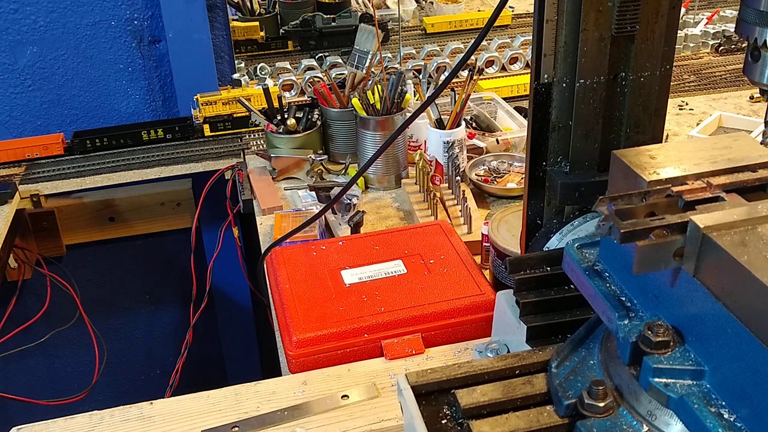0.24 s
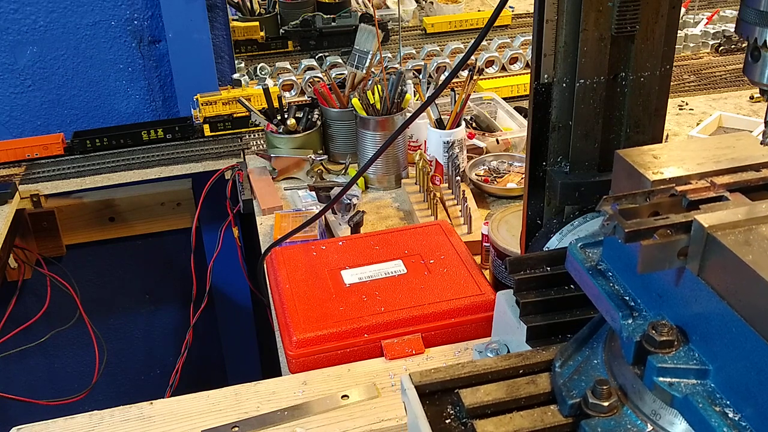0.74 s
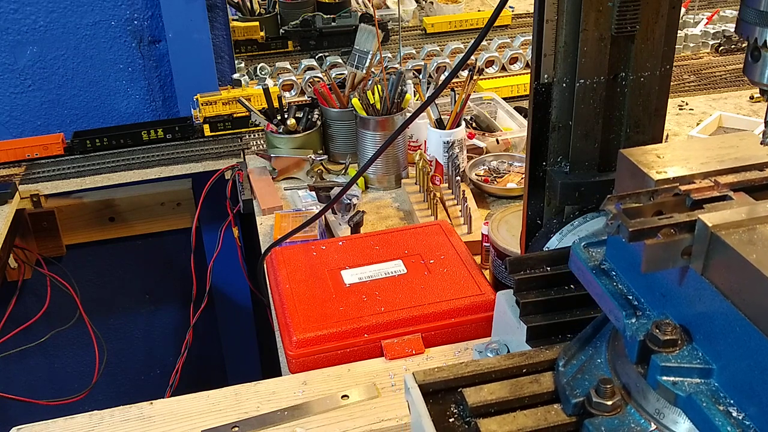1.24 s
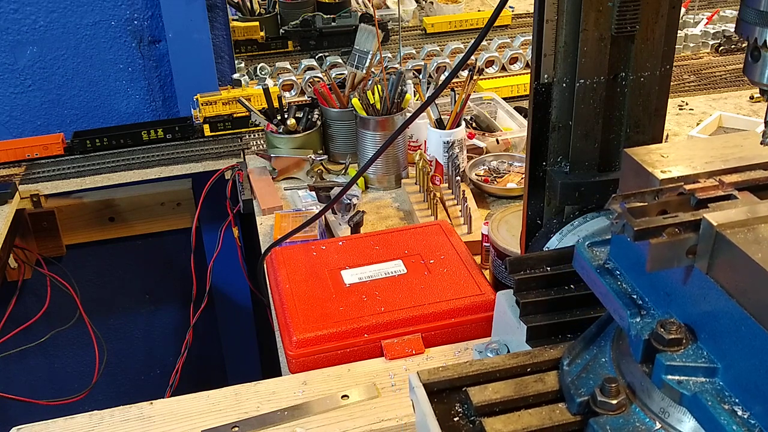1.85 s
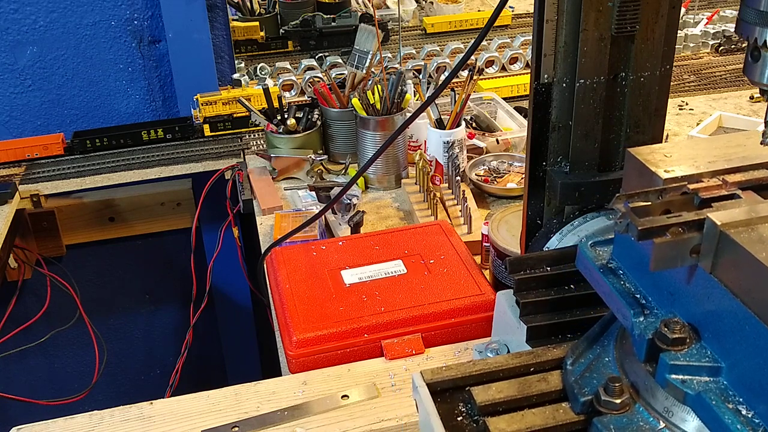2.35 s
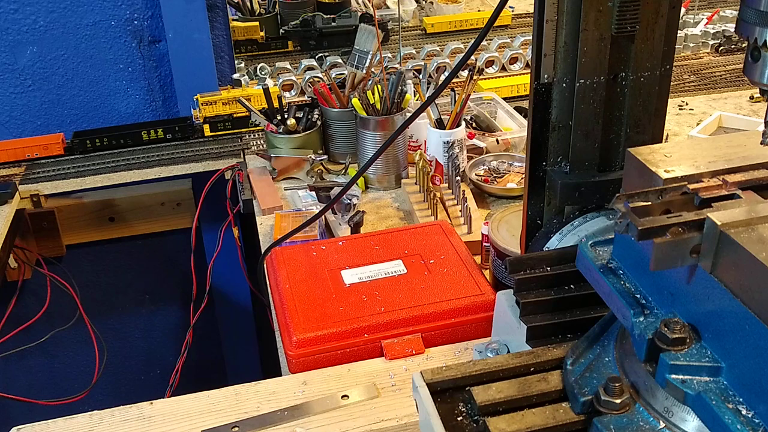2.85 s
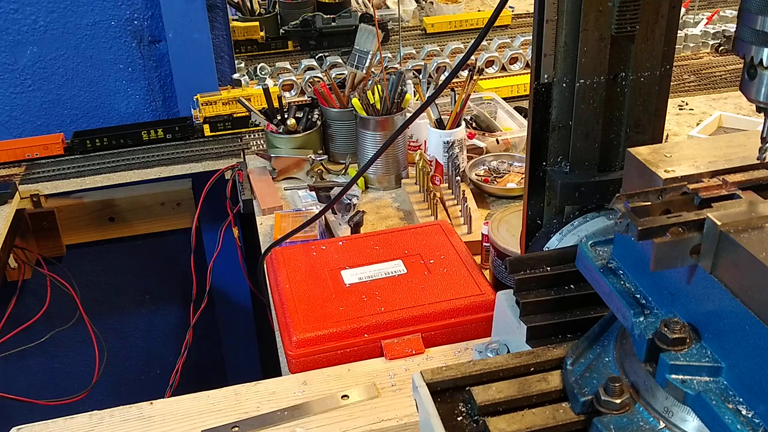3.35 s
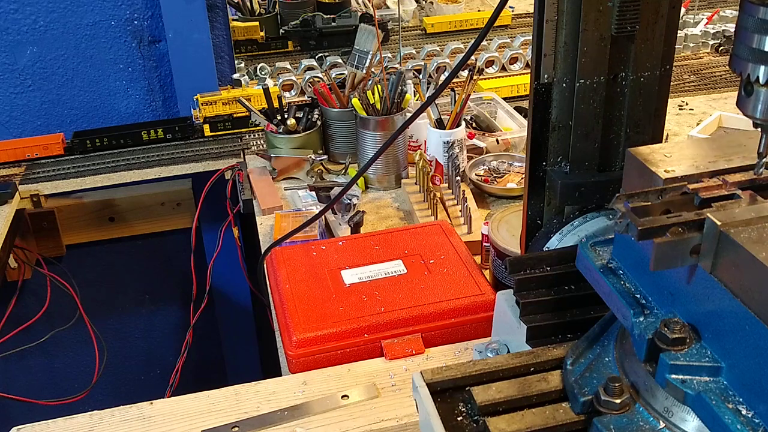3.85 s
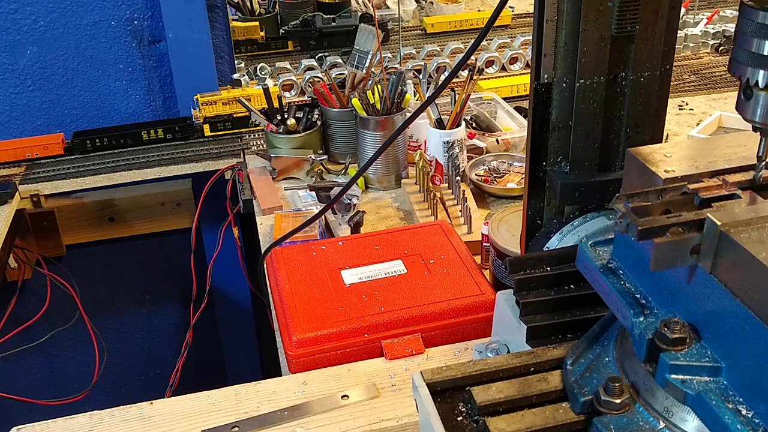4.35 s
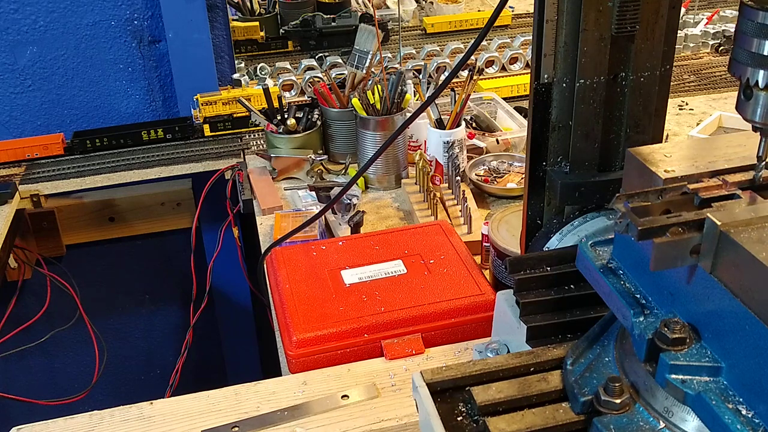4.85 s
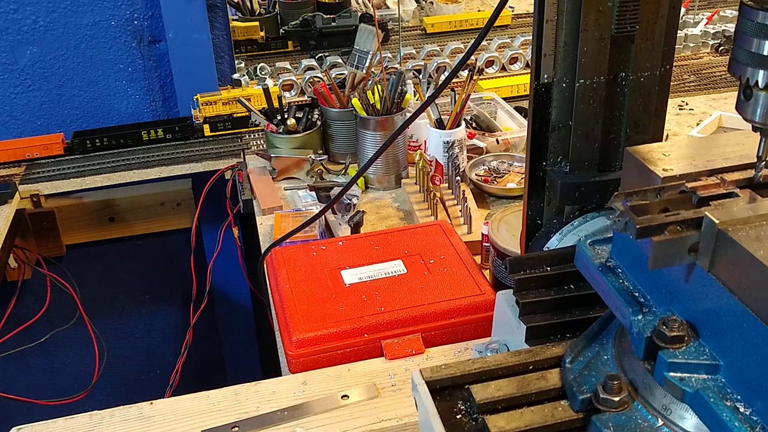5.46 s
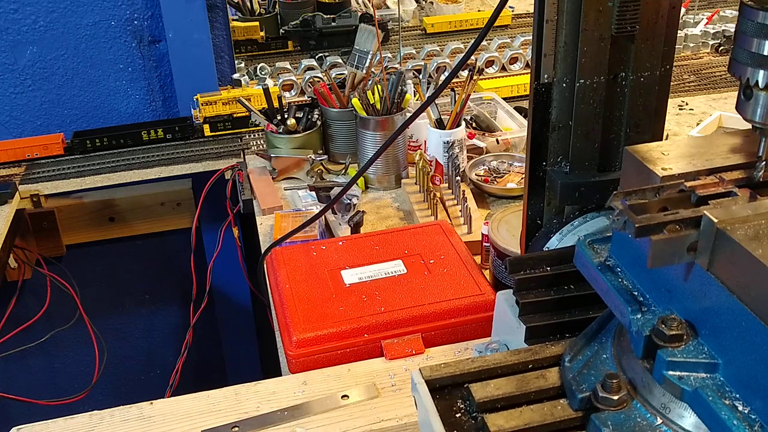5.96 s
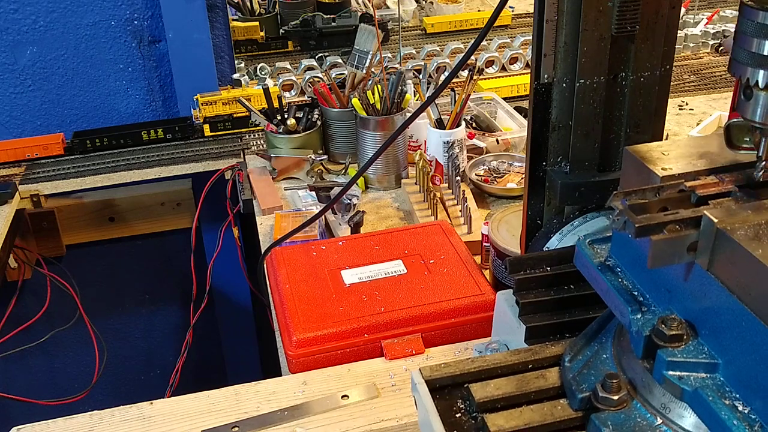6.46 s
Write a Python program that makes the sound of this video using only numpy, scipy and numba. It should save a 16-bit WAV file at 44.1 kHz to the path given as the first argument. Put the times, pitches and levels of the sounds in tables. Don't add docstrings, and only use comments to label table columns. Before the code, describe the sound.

Close, wide stereo of dry metal sticking and slipping: four rough, low-rattling groans with rising rings and dull table thuds, then four fast, higher squeals, loudest on the third. Tiny clicks fall between strokes. Then the machine stops and sparse, soft knocks and ticks come irregularly until the end, with quiet bassy air and distant fans in a small, briefly echoing workshop.

```python
import sys
import numpy as np
from scipy import signal
from scipy.fft import rfft, irfft
from scipy.io import wavfile
from scipy.ndimage import uniform_filter1d, minimum_filter1d
from numba import njit

SR = 44100
rng = np.random.default_rng(int(sys.argv[2]) if len(sys.argv) > 2 else 0)


def put_to_file(sound):
    columns = np.atleast_2d(sound).T
    safe = np.clip(columns, -1, 1)
    whole_steps = np.round(safe * 32767)
    wavfile.write(sys.argv[1], SR, whole_steps.astype(np.int16))


def invert_db(x):
    u = np.asarray(x, float) / 20
    return 10 ** u


N = 295188
EDGE_DB, SILENT_DB = -21.5, -51.5


def rms_one(x):
    return x / np.sqrt(np.mean(x ** 2) + 1e-20)


def evened(x, over_s):
    return x / np.sqrt(uniform_filter1d(x * x, round(over_s * SR)) + 1e-12)


def between(x, low_hz, high_hz):
    band_hz = [low_hz, min(high_hz, .45 * SR)]
    return signal.sosfilt(signal.butter(2, band_hz, "band", fs=SR, output="sos"), x)


def delayed(x, lag_s):
    hz = np.fft.rfftfreq(N, 1 / SR)
    return irfft(rfft(x) * np.exp(-2j * np.pi * hz * lag_s), N)


def at_hz(points, hz):
    points_hz, values = np.transpose(points)
    return np.interp(np.log(hz + 1), np.log(points_hz), values)


def drift(rate_hz):
    r = np.exp(-2 * np.pi * rate_hz / SR)
    noise = rng.standard_normal(N + 9000)
    return rms_one(signal.lfilter([1], [1, -2 * r, r * r], noise)[9000:])


def in_time(strokes):
    t = np.arange(N) / SR
    s, *columns = np.concatenate(strokes).T
    gate = sum((t >= rows[0][0]) & (t <= rows[-1][0]) for rows in strokes)
    return [uniform_filter1d(gate * 1., size=200)] + [np.interp(t, s, c) for c in columns]


def body(x, modes):
    out = 0
    for k, (hz, width_hz, db) in enumerate(modes):
        r = np.exp(-np.pi * width_hz / SR)
        a = [1, -2 * r * np.cos(2 * np.pi * hz / SR), r * r]
        ring = signal.lfilter([(1 - r * r) / 2, 0, (r * r - 1) / 2], a, x + 1e-18)
        out = out + (-1) ** k * invert_db(db) * ring
    return out


@njit
def moving_ring(x, hz, r, turn):
    y = np.zeros(len(x))
    for i in range(2, len(x)):
        push = (1 - r * r) / 2 * (x[i] - x[i - 2])
        y[i] = push + 2 * r * np.cos(turn * hz[i]) * y[i - 1] - r * r * y[i - 2]
    return y


def slips(rate_hz, rough, jitter, uneven_db, grit):
    rough = np.clip(rough, 0, 1)
    turns = np.cumsum(rate_hz * (1 + jitter * rough * drift(60)) / SR)
    at = np.flatnonzero(np.diff(np.floor(turns)) > 0)
    late = np.clip((turns[at + 1] % 1) * SR / rate_hz[at], 0, 1)
    size = invert_db(uneven_db * rough * drift(90))[at] * np.sqrt(SR / rate_hz[at])
    pulses = np.zeros(N)
    pulses[at] = size * late
    pulses[at + 1] += size * (1 - late)
    scrape = rng.standard_normal(N) * np.exp(-2.2 * (turns % 1))
    return pulses * (1 - rough) + grit * rough * scrape


# time in seconds, depth in dB.
CATCHES = [
    (0.014, 9),
    (.062, 5),
    (0.368, 9),
    (0.437, 12.5),
    (1.082, 7),
    (1.428, 4),
    (1.981, 3.5),
    (2.064, 3),
    (2.399, 7),
]


def catches_db():
    t, catch_s = np.arange(N) / SR, 0.013
    return sum(-depth_db * np.exp(-((t - s) / catch_s) ** 2) for s, depth_db in CATCHES)


def groan_stroke(s, length, db, first_hz, thud_db):
    attack_s, release_s, sag_db_per_s = 0.015, .03, 74.5
    hum_db, thud_from = -53, 0.4
    ages = [0, min(attack_s, .5 * length), thud_from * length, length, length + release_s]
    levels = [db + EDGE_DB, db, db - sag_db_per_s * ages[2], db - sag_db_per_s * length, db + SILENT_DB - 14]
    table = [hum_db - 10.5, hum_db, hum_db, thud_db, thud_db - 21.5]
    return [(s + a, a, level, first_hz, low) for a, level, low in zip(ages, levels, table)]


# start in seconds, length in seconds, level in dB,
# first pitch of the ringing part in Hz, closing thud of the table in dB.
GROANS = [
    (0, 0.16, -22, 880, -46),
    (0.327, 0.16, -21.5, 770, -42.5),
    (0.648, .175, -21, 739, -41.5),
    (0.969, .18, -21.5, 658, -45),
]
# centre in Hz, width in Hz, level in dB.
GROAN_BODY = [(760, 162, 4), (1456, 160, 5), (1699, 83, 8), (2114, 482, 0), (3040, 125, -4),
              (3900, 340, -12), (5890, 700, -23.5), (8340, 9000, -45), (13370, 2400, -37.5)]
TABLE_BODY = [(149, 118, -7.5), (259, 58, 1), (405, 39, 2)]


def groans():
    gate, age, level_db, first_hz, table_db = in_time([groan_stroke(*row) for row in GROANS])
    level_db = level_db + catches_db()
    rate_hz, slowing_hz_per_s, rough, roughening_per_s = 150, 40, .17, .9
    pulses = slips(rate_hz - slowing_hz_per_s * age, rough + roughening_per_s * age,
                   jitter=0.11, uneven_db=2, grit=5.5)

    top_hz, climb_s, ring_db, fade_db_per_s = 1208, 0.15, 15.5, 39
    ring_hz = top_hz - (top_hz - first_hz) * np.exp(-(age / climb_s) ** 1.8)
    ring = moving_ring(pulses, ring_hz, np.exp(-np.pi * 80 / SR), 2 * np.pi / SR)
    upper = body(pulses, GROAN_BODY) + invert_db(ring_db - fade_db_per_s * age) * ring
    upper = evened(between(upper, 400, 11000), over_s=0.046)

    bright_db_per_db, breakaway_db, breakaway_s = 0.72, 5.5, .035
    bright_db = bright_db_per_db * (level_db + 27.5) + breakaway_db * np.exp(-age / breakaway_s)
    upper = upper + between(upper, 2100, 18000) * (invert_db(bright_db) - 1)
    table = evened(between(body(pulses, TABLE_BODY), 103, 650), over_s=0.12)
    return gate * invert_db(level_db) * upper, gate * invert_db(table_db) * table


# frequency in Hz, level in dB per Hz.
AIR = [(35, -36), (60, -14), (120, 0.2), (220, 1), (400, -4), (800, -14), (1400, -23), (2200, -25),
       (3200, -31), (4500, -38), (6500, -43), (9000, -50), (15000, -56)]
# frequency in Hz, likeness of the ports from 0 to 1.
AIR_LIKENESS = [(60, 0.042), (250, 0.99), (800, 0.82), (2000, 0.033), (8000, .02)]
# frequency in Hz, left minus right in dB.
AIR_BALANCE = [(60, 6), (110, 8), (200, 7), (380, 3), (900, 1), (8000, 2)]


def air():
    hz = np.fft.rfftfreq(N, 1 / SR)
    mid, side = rfft(rng.standard_normal((2, N))) * invert_db(at_hz(AIR, hz))
    alike = np.clip(at_hz(AIR_LIKENESS, hz), 0, 1)
    ports = np.sqrt(1 + alike) * mid + np.sqrt(1 - alike) * side * [[1], [-1]]
    ports = irfft(ports * invert_db(at_hz(AIR_BALANCE, hz) * [[.5], [-.5]]), N)
    air_db = -48
    return invert_db(air_db + 0.28 * drift(9)) * rms_one(ports)


def room(x):
    t60_s, top_t60_s, tail_db = .25, .13, -7
    early_s, early_db = 0.006, -1.5
    t = np.arange(round(.45 * SR)) / SR
    noise = rng.standard_normal((2, len(t)))
    bass = signal.sosfilt(signal.butter(1, 600, fs=SR, output="sos"), noise)
    noise = noise - bass + .75 * bass[0] + .25 * bass
    low = signal.sosfilt(signal.butter(1, 2500, fs=SR, output="sos"), noise)
    tail = low * invert_db(-60 * t / t60_s) + (noise - low) * invert_db(-60 * t / top_t60_s)
    tail *= np.clip(t / 0.0031 - .5, 0, 1)
    early = between(noise * np.exp(-t / early_s), 1300, 18000)
    echoes = 0
    for part, db in [(tail, tail_db), (early, early_db)]:
        echoes = echoes + invert_db(db) * part / np.sqrt(np.sum(part ** 2) / 2)
    return signal.fftconvolve(x[None], echoes, axes=1)[:, :N]


# time in seconds, strength in dB, weight into the table in dB, sharpness in dB.
BACKLASH = [(.153, -26, -30, -14.5), (.344, -40.5, -10.5, -8), (.486, -19, -24.5, -22),
            (.775, -33.5, -15.5, -6.5), (.821, -22.5, -33, -17.5), (1.15, -29, -25, -18.5),
            (1.276, -50, -11, -17), (1.92, -50, -3, -22), (2.26, -47.5, -21, -14.5),
            (2.288, -57.5, -18.5, 7), (2.42, -25.5, -20.5, -26.5)]
KNOCKS = [(2.561, -55.5, -16, -7.5), (2.609, -57.5, -13, -8.5), (3.19, -36, -13, -18),
          (3.2, -40, -9, -19.5), (3.42, -61, -9, -16.5), (3.585, -50.5, -6.5, -25),
          (3.684, -33.5, -0.5, -27), (3.694, -32, -5, -33), (4.335, -45, -11.5, -31),
          (4.369, -44.5, -4.5, -25), (5.055, -42, -21.5, -36), (5.074, -49, -12.5, -34),
          (5.1, -52.5, -5.5, -25), (5.448, -43, -19.5, -30), (5.597, -39, -19.5, -33),
          (5.633, -31, -28, -22.5), (5.638, -35, -18.5, -27.5), (5.79, -50, -17, -22.5),
          (6.197, -51.5, -20, -12), (6.384, -34, -27.5, -20.5), (6.552, -51, -14.5, -23)]
# time in seconds, strength in dB.
TICKS = [
    (1.523, -61),
    (2.638, -75),
    (3.183, -64.5),
    (4.821, -73),
    (6.132, -79.5),
]
# centre in Hz, width in Hz, level in dB.
KNOCK_LOW = [(205, 33, 2.3), (371, 96, 13.2), (471.6, 120, 13), (667, 143, 2.1)]
KNOCK_MIDDLE = [(883, 61, -3.5), (1280, 67, -6), (1700, 210, -10), (2460, 300, -18)]
KNOCK_HIGH = [(2893, 240, 0.5), (3900, 310, -1), (5600, 1900, -14)]
KNOCK_TOP = [(8700, 600, 0.5), (11840, 1700, -5.5), (14000, 2500, -4)]


def knocks():
    tick_weight_db, tick_sharp_db, tick_top_db = -31, 1, 16
    ticks = [(*tick, tick_weight_db, tick_sharp_db) for tick in TICKS]
    s, db, weight_db, sharp_db = np.transpose([*BACKLASH, *KNOCKS, *ticks])
    top_db = sharp_db - 15 + tick_top_db * np.isin(s, np.transpose(TICKS)[0])

    rattle_s = np.clip(.0066 + .00017 * weight_db, .0008, .03)
    age = np.arange(4000) / SR / rattle_s[:, None]
    rattles = rng.standard_normal((len(s), 4, 4000)) * (np.sqrt(age) * np.exp(-age))[:, None]
    rattles[:, 1] += .7 * np.exp(-((age - .5) / .12) ** 2)

    parts = [(KNOCK_MIDDLE, 0), (KNOCK_LOW, weight_db + 20.5),
             (KNOCK_HIGH, sharp_db + 16.0), (KNOCK_TOP, top_db + 11.0)]
    knock_db = 4
    out = np.zeros(N + 4000)
    for k, (modes, share_db) in enumerate(parts):
        rings = between(body(rattles[:, k], modes), 0.67 * modes[0][0], 1.0 * modes[-1][0])
        rings *= (invert_db(db + share_db + knock_db) / np.abs(rings).max(axis=1))[:, None]
        for at, ring in zip(np.round(s * SR).astype(int), rings):
            out[at:at + 4000] += ring
    return out[:N]


# time in seconds, pitch in Hz, level in dB.
WHISTLE = [
    (.722, 4230, -52),
    (.73, 4280, -24),
    (.742, 4084, -17),
    (.755, 3900, -21),
    (.763, 3540, -30.5),
    (.772, 3260, -21.5),
    (.783, 3480, -45.5),
    (.79, 3250, -62.5),
]
SING_UP = [
    (2.274, 890, -46),
    (2.296, 875, -20.5),
    (2.302, 860, -22),
    (2.308, 840, -50),
]


def whistle():
    gate, hz, level_db = in_time([WHISTLE, SING_UP])
    angle = 2 * np.pi * np.cumsum(hz * (1 + .006 * drift(120))) / SR
    tone = np.sin(angle) + invert_db(-26) * np.sin(2 * angle) + invert_db(-32) * np.sin(3 * angle)
    return gate * invert_db(level_db + 2.5 * drift(150)) * tone


def squeak_stroke(s, length, db, fastest_s, last_hz):
    attack_s, release_s, bite_db, sag_db = .013, 0.028, -3, -11
    first_hz, fastest_hz, settled_hz, settle_s = 675.5, 747, 613, .048
    rough_first, rough_settled, rough_last, rough_worst = .55, .14, .55, 0.34
    clearing_per_s, clears_s = 9, .016
    clean = np.clip(rough_first - clearing_per_s * (fastest_s - s), 0, rough_worst)
    bitten = s + attack_s
    end = s + length
    rows = [(s, db + EDGE_DB, first_hz, rough_first),
            (bitten, db + bite_db, first_hz, rough_first),
            (max(fastest_s - clears_s, bitten + .001), db - 4.5, fastest_hz - 25, rough_first - .15),
            (max(fastest_s, bitten + .002), db, fastest_hz, clean),
            (fastest_s + settle_s, db - 1.5, settled_hz, clean + rough_settled),
            (end, db + sag_db, last_hz, rough_last),
            (end + release_s, db + SILENT_DB, last_hz, rough_last)]
    return [(at, at - s, *rest) for at, *rest in rows]


# start in seconds, length in seconds, level in dB,
# moment of fastest slipping in seconds, last rate in slips per second.
SQUEAKS = [
    (1.3, .162, -16, 1.355, 535),
    (1.614, .18, -15, 1.667, 595),
    (1.945, .146, -14, 1.998, 540),
    (2.291, 0.1146, -18, 2.305, 610),
]
# centre in Hz, width in Hz, level in dB.
SQUEAK_BODY = [(670, 310, 6.5), (1120, 450, 7.5), (1477, 463, 6.5), (1936, 170, 11.5), (2266, 293, 5.5),
               (2950, 550, -0.5), (3660, 179, -5.5), (4070, 1090, -10), (5850, 1135, -15.5),
               (7870, 1300, -79.5), (9900, 4900, -38), (14000, 1250, -40)]
TOP_EDGES_HZ = [3900, 6600, 8800, 12200, 18000]


def squeaks():
    gate, age, level_db, rate_hz, rough = in_time([squeak_stroke(*row) for row in SQUEAKS])
    level_db = level_db + catches_db()
    rate_hz = rate_hz * (1 + .009 * drift(450))
    pulses = slips(rate_hz, np.maximum(rough, .2), jitter=0.033, uneven_db=10.0, grit=1.5)
    upper = evened(between(body(pulses, SQUEAK_BODY), 320, 18000), over_s=0.028)

    top = 0
    for k, (low_hz, high_hz) in enumerate(zip(TOP_EDGES_HZ, TOP_EDGES_HZ[1:])):
        top = top + between(upper, low_hz, high_hz) * invert_db(3.1 * drift(14)) * (-1) ** (k + 1)
    dulling_db_per_s = 52.5
    top_db = 0.44 * (level_db + 27) - dulling_db_per_s * age + 1.0 * drift(25)
    upper = between(upper, 220, 3400) + top * invert_db(top_db)

    table_db = -45.5
    table = rms_one(between(rng.standard_normal(N), 160, 585))
    return gate * invert_db(level_db) * upper, gate * invert_db(table_db + 3.4 * drift(30)) * table


def scene():
    groan, groan_table = groans()
    squeak, squeak_table = squeaks()
    mill = invert_db(-7) * (groan + squeak + whistle() + knocks())
    table = invert_db(10.5) * groan_table + invert_db(1.5) * squeak_table
    port_lag_s = .00009
    direct = np.array([delayed(mill, port_lag_s), mill]) + table * invert_db(np.array([[-2.5], [1.5]]))
    return direct + room(mill + table) + air()


def low_pass(x):
    return signal.sosfilt(signal.butter(12, 15980, fs=SR, output="sos"), x)


def record(dry):
    widen_lag_s, widen_share = .000452, .76
    across_band = signal.butter(1, [330, 9000], "band", fs=SR, output="sos")
    wide = dry - widen_share * signal.sosfilt(across_band, delayed(dry[::-1], widen_lag_s))

    open_db, span_db, hold_s, depth_db = -39, 11, .04, 7
    power = np.mean(between(wide, 234, 8000) ** 2, axis=0)
    level_db = 10 * np.log10(uniform_filter1d(power, size=300) + 1e-12)
    shut = np.clip((open_db - level_db) / span_db, 0, 1)
    hold = round(hold_s * SR)
    shut = minimum_filter1d(shut, hold, origin=(hold - 1) // 2)
    shut = uniform_filter1d(shut, size=250)

    hiss_db = -84
    wide = wide * invert_db(-depth_db * shut) + invert_db(hiss_db) * rng.standard_normal(dry.shape)
    wide = signal.sosfilt(signal.cheby2(10, 50, 16500, fs=SR, output="sos"), wide)
    return low_pass(wide)


dry = scene()
out = record(dry)
put_to_file(out)
```